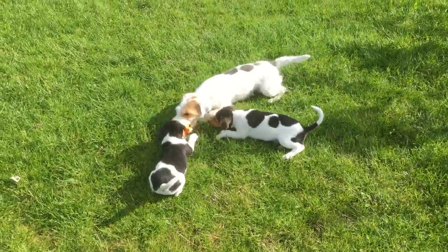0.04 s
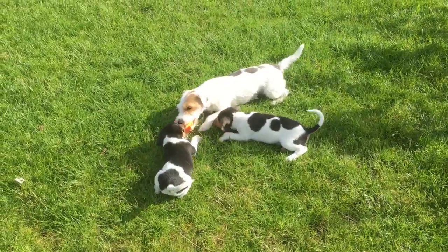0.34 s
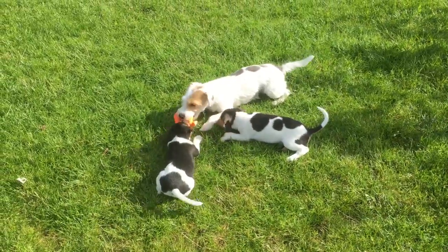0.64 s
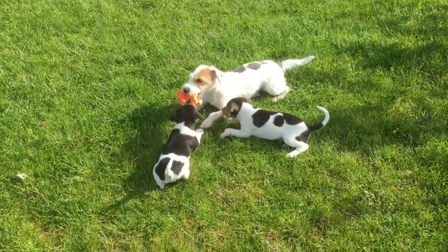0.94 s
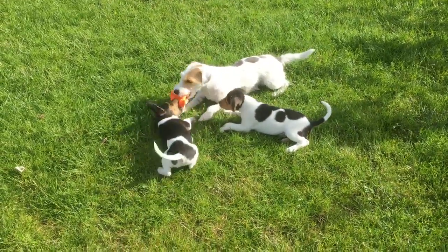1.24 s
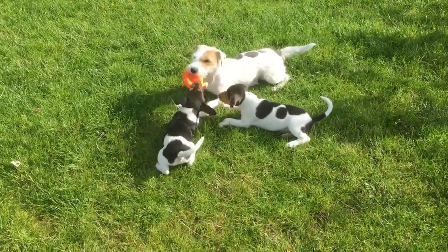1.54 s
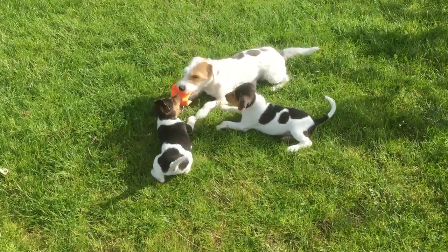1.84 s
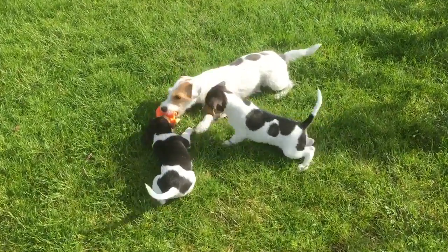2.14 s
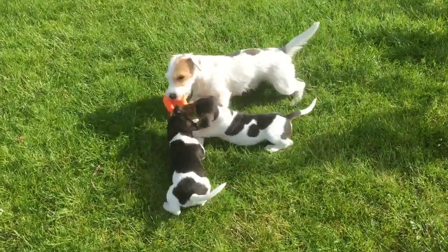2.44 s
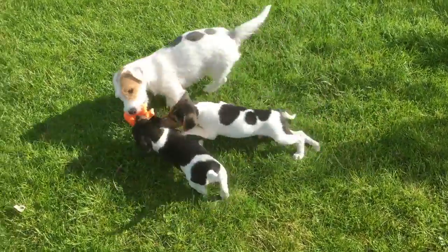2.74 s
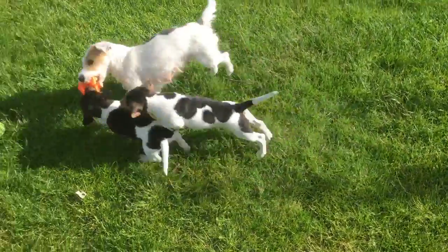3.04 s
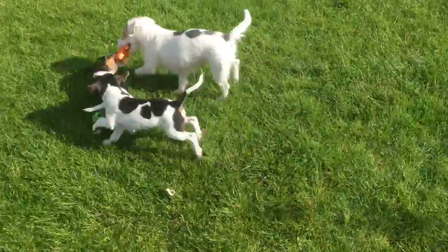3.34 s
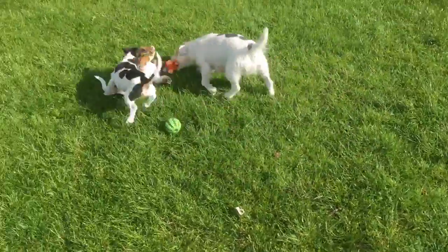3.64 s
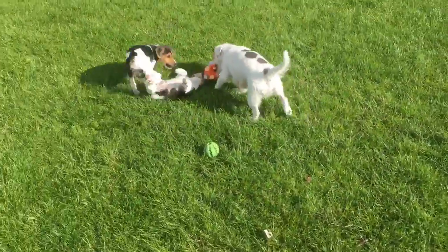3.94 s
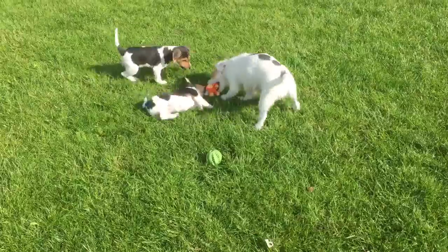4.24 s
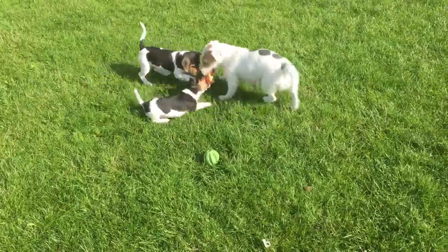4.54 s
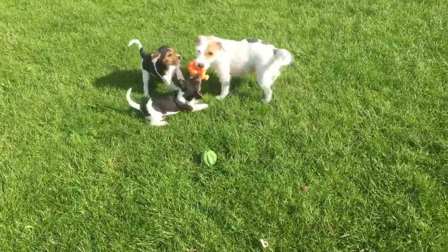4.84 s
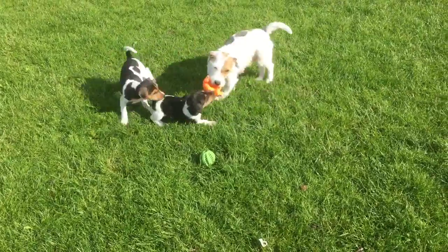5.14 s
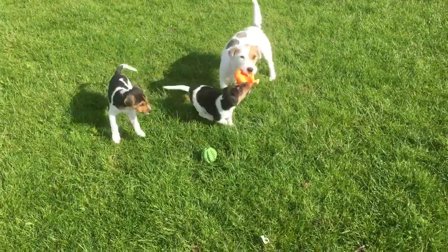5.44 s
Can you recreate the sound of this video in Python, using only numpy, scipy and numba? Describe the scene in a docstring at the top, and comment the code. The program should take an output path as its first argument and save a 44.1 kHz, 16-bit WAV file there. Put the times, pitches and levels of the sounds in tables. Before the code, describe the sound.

Rough, low play growls from small dogs tugging a squeaky rubber toy, with snorts, tooth clicks and a breeze rumbling on the microphone.

```python
"""Tug of war on the lawn

Two puppies and a grown terrier tug at a rubber toy, a few metres from a hand-held microphone.
They growl in rough bouts that open into a snarl, and snort through nose and teeth. The bitten toy
gives two pairs of yapping squeaks through its reed, air out and air in. Teeth click, a dog grunts,
the grass and the handled microphone rustle, and a breeze buffets the capsule."""
import sys
import numpy as np
from scipy import signal
from scipy.fft import rfft, irfft
from scipy.io import wavfile
from scipy.ndimage import uniform_filter1d
from numba import njit

SR = 44100
rng = np.random.default_rng(int(sys.argv[2]) if len(sys.argv) > 2 else 0)


def unload_wav(signal):
    """Save mono or channel-first audio to the path in sys.argv[1] as 16-bit WAV at rate SR, clipped to [-1, 1]."""
    wavfile.write(
        sys.argv[1],
        SR,
        np.round(np.clip(np.atleast_2d(signal).T, -1, 1) * 32767).astype(np.int16),
    )


N = 251370
T = np.arange(N) / SR
FREQ = np.maximum(np.arange(N // 2 + 1) * SR / N, 1e-3)


def undb(db):
    """Decibels to gain."""
    return 10 ** (np.asarray(db) / 20)


def unit(x):
    """Scale to rms 1."""
    return x / np.sqrt(np.mean(x ** 2))


def steady(x, span_s):
    """Hold the running rms at 1."""
    return x / np.sqrt(np.maximum(uniform_filter1d(x ** 2, int(span_s * SR)), 1e-12))


def noise():
    """White noise."""
    return rng.standard_normal(N)


def walk(rate_hz):
    """Smooth random drift of rms 1, with little motion faster than rate_hz."""
    return unit(irfft(rfft(noise()) * np.exp(-(FREQ / rate_hz) ** 2), N))


def colour(x, points):
    """Filter by a curve of (frequency [Hz], gain [dB]) and scale to rms 1."""
    hz, db = np.transpose(points)
    return unit(irfft(rfft(x) * undb(np.interp(np.log(FREQ), np.log(hz), db)), N))


def ring(x, modes):
    """Steep resonances side by side: (centre [Hz], width [Hz], gain [dB])."""
    response = sum(undb(db) / (1 + 1j * hz / width * (FREQ / hz - hz / FREQ)) ** 2
                   for hz, width, db in modes)
    return irfft(rfft(x) * response, N)


@njit
def bandpass(x, hz, width_hz):
    """State-variable band-pass with a centre for every sample."""
    y, band_state, low_state = np.empty(len(x)), 0., 0.
    for i in range(len(x)):
        g, damping = np.tan(np.pi * hz[i] / SR), width_hz / hz[i]
        band = (band_state + g * (x[i] - low_state)) / (1 + g * (g + damping))
        band_state = 2 * band - band_state
        low_state += 2 * g * band
        y[i] = damping * band
    return y


def cavity(x, hz, width_hz):
    """Two equal band-passes in a row; the centre may stand or move."""
    centre = np.full(len(x), hz, dtype=float)
    return bandpass(bandpass(x, centre, float(width_hz)), centre, float(width_hz))


def lowpass(x, hz):
    """Steep treble cut."""
    return signal.sosfilt(signal.butter(12, hz, fs=SR, output="sos"), x)


def curve(rows, column):
    """One column of a table, joined by straight lines in time."""
    rows = np.asarray(rows)
    return np.interp(T, rows[:, 0], rows[:, column])


def gate(start_s, end_s, attack_s, release_s):
    """Gain that is 1 from start to end, with a ramp before and after."""
    return np.interp(T, [start_s - attack_s, start_s, end_s, end_s + release_s], [0, 1, 1, 0])


def slack(t, start_s, length_s, crest):
    """How far an effort is from its crest: 0 there, 1 at the farther end."""
    return np.abs((t - start_s) / length_s - crest) / max(crest, 1 - crest)


def surges(rows, base):
    """Gain of surges that grow and die exponentially, added in power to a base gain."""
    power = sum((undb(db) * np.exp(-np.maximum((s - T) / rise, (T - s) / fall))) ** 2
                for s, rise, fall, db in rows)
    return np.sqrt(base ** 2 + power)


def add(track, start_s, sound, peak_db):
    """Mix in a short sound at a given peak level."""
    i = max(int(start_s * SR), 0)
    track[i:i + len(sound)] += (undb(peak_db) * sound / np.abs(sound).max())[:N - i]


def outdoor_air():
    """The quiet ambience of the garden, wavering slightly in level."""
    # spectrum of the ambience: (frequency [Hz], relative level [dB])
    spectrum = [(88, -65), (150, 8.5), (352, -8.5), (643, -7.5), (912, -11.5), (1060, -11), (1290, -10),
                (4930, -21.5), (5990, -21), (15500, -34.5)]
    return colour(noise(), spectrum) * undb(-63.5 + 0.7 * walk(6))


def wind():
    """Eddies rumble right on the microphone; the stronger ones give it a bump of a few cycles."""
    # spectrum of the rumble: (frequency [Hz], relative level [dB])
    spectrum = [(20, -42), (35, -7), (55, 3), (80, -1), (120, -6.5), (200, -15.5), (350, -28.5), (700, -44),
                (2000, -83.5)]
    # gusts: (time of peak [s], rise constant [s], fall constant [s], level [dB])
    gusts = [(.1, 0.6, 0.15, -37.5), (3.35, 0.14, 0.11, -34), (3.62, 0.031, 0.086, -30.5),
             (3.81, 0.14, 0.085, -26.5), (4.1, 0.09, 0.25, -32), (4.73, 0.018, 0.14, -33.5),
             (5.16, 0.037, 0.12, -33.5)]
    # single buffets on the capsule: (time [s], peak [dB], starting pitch [Hz])
    buffets = [(.012, -24.5, 146), (0.075, -20.5, 166.6), (0.126, -27.5, 98), (1.213, -46, 246),
               (1.852, -31, 61.3), (2.035, -30.5, 60.3), (2.269, -31.5, 74.6), (2.671, -30, 126),
               (3.597, -26.5, 78.6), (3.704, -19.5, 106.2), (3.76, -18.5, 81), (3.826, -14, 100),
               (3.921, -22.5, 100.6), (4.46, -28, 118.2), (4.566, -30, 87), (4.722, -19, 114.7),
               (5.106, -25.5, 96), (5.142, -24, 126.3), (5.307, -23.5, 110.2)]
    calm_db, breeze_db, ease_db_per_s = -68, -45, 1.56
    since = T - 1.69  # near calm until the breeze gets up
    breeze = undb(calm_db) + undb(breeze_db - ease_db_per_s * since) * np.clip(since / 0.3, 0, 1)
    rumble = steady(colour(noise(), spectrum), span_s=0.0716)
    out = rumble * surges(gusts, breeze) * undb(3.2 * walk(14.4))
    t = T[:SR // 6]
    for s, db, hz in buffets:
        cycles = hz * .09 * np.log1p(t / .09)  # the bump sags in pitch as it dies
        lopsided = np.sin(2 * np.pi * cycles) + 0.23 * np.sin(4 * np.pi * cycles)
        add(out, s, lopsided * cycles * np.exp(-cycles / 0.7), db)
    return out


def rustle():
    """Grass and the handled microphone: hiss and tiny clicks, in bands that flare up each on its own."""
    # tone of the rustle: (frequency [Hz], relative gain [dB])
    tone = [(300, 3), (1000, 4.5), (2000, -4.5), (4000, -8), (7000, -11), (11000, -9.5), (16000, -8.5)]
    # swells of rustle and hiss: (time of peak [s], rise constant [s], fall constant [s], level [dB])
    swells = [(1.03, 0.047, .1, -69.5), (1.68, 0.15, 0.096, -66.5), (2.1, 0.084, 0.15, -67.5),
              (2.37, 0.075, 0.32, -59), (2.88, 0.14, 0.25, -56), (3.1, 0.025, 0.025, -55.5),
              (3.3, 0.057, 0.36, -53.5), (3.85, 0.017, 0.082, -58.5), (4.23, 0.027, 0.21, -61),
              (4.52, 0.08, 0.074, -65.5), (5.15, 0.26, 0.24, -70)]
    bands, clicks_per_s = 0, 1500
    for hz in (1300, 3200, 6500, 12000):
        clicks = (rng.random(N) < clicks_per_s / SR) * noise()
        clicks *= undb(3.5 * np.minimum(rng.exponential(size=N), 5))  # a few stand out
        bands += ring(unit(clicks) + noise(), [(hz, hz, 0)]) * undb(2.2 * walk(22))
    texture = colour(bands, tone) * undb(1.3 * walk(25))
    light_rustle = undb(-74.5) * np.clip((T - 0.057) / 1.28, 0, 1)  # builds as the tussle starts
    return texture * surges(swells, light_rustle)


def knocks():
    """Tooth clicks and a clipped grunt: each a noise burst that rings a short knock and a dry crack."""
    # short knocks: (time [s], knock peak [dB], knock resonance [Hz], crack peak [dB])
    events = [(1.1715, -41, 1540, -54), (2.4237, -51, 1595, -43), (3.4799, -31.5, 1350, -76),
              (3.728, -49, 1013, -41.5), (4.546, -34, 1408, -43), (5.075, -34, 1700, -65),
              (5.1076, -35.5, 1480, -52), (5.1473, -31, 1600, -41), (5.2191, -25, 1620, -31)]
    out, t = np.zeros(N), T[:SR // 20]
    crack_hz = np.full(len(t), 3700.)
    for s, knock_db, knock_hz, crack_db in events:
        burst = rng.standard_normal(len(t)) * (np.exp(-t / 0.00088) + 0.18 * np.exp(-t / 0.0056))
        add(out, s, lowpass(cavity(burst, knock_hz, width_hz=750), 1714), knock_db)
        add(out, s, bandpass(burst, crack_hz, width_hz=1160.), crack_db)
    return out


def snorts():
    """Fluttering jets of air through nose and bared teeth, each whistling in two narrow passages."""
    # breaths: (time of peak [s], length [s], then per passage: centre [Hz], width [Hz], level [dB])
    breaths = [(1.73, 0.12, 3720, 1900, -60.5, 12010, 3000, -62.5),
               (2.09, 0.49, 1440, 1400, -58.5, 2820, 2530, -67.5),
               (2.478, 0.057, 2052, 499, -58.5, 3972, 1500, -71),
               (2.642, 0.25, 1774, 450, -57.5, 2934, 500, -62.5),
               (3.012, .13, 1449, 2018, -53.5, 3721, 1500, -79),
               (3.299, 0.046, 3995, 590, -42, 5490, 645, -48.5),
               (3.324, 0.28, 2093, 1494, -51, 3660, 694, -52),
               (3.438, 0.061, 1820, 598, -52, 3864, 895, -60),
               (3.588, 0.099, 1800, 1490, -52, 3870, 1520, -62.5),
               (3.83, 0.1, 2410, 1460, -43.5, 4586, 2000, -93),
               (4.061, 0.16, 1774, 893, -53.5, 3930, 1195, -65),
               (4.56, 0.28, 3096, 693.8, -62.5, 4794, 1310, -59),
               (4.88, 0.32, 9230, 1297, -67, 11950, 1506, -66.5),
               (5.107, 0.44, 3500, 1930, -61.5, 6000, 2000, -100)]
    out, jet = np.zeros(N), noise() * undb(4 * walk(130))
    for s, length, *passages in breaths:
        on = np.abs(T - s) < length / 2
        arch = np.cos(np.pi * (T[on] - s) / length) ** 1.72
        for hz, width, db in np.reshape(passages, (2, -1)):
            out[on] += unit(cavity(jet[on], hz, width)) * undb(db) * arch
    return out


def toy():
    """A reed chops the air into pulses that ring the hollow rubber; each grip colours it anew."""
    # squeezes: (start [s], length [s], crest [share of length], reed pitch [Hz], level [dB],
    #            sag by the end [Hz], fade by the end [dB], power of the decline [1 straight, 2 round])
    squeaks = [(.03, 0.069, 0.11, 458, -28.5, 16.5, 2.9, 0.87),
               (.1405, 0.055, 0.26, 463.9, -27, 18, 4.9, 2.3),
               (4.2365, 0.062, .26, 472, -24, 58, 12.9, 1.2),
               (4.3415, 0.041, 0.16, 468, -26, 31, 11.3, 2.47)]
    # resonances of the rubber: (centre [Hz], width [Hz], relative gain in each of four squeaks [dB])
    resonances = [(427, 350, 3.5, -8, -3, -2), (866, 320, 7.5, -2.5, 3.5, 6.5),
                  (1316, 170, 6, -2, 12, 10.5), (2160, 310, 2, -9.5, -38, -32), (2744, 252, 11, 3, -3, 2),
                  (4310, 370, -22, -12, -19.5, -8.5), (4970, 390, -5, -11.5, -28, -30),
                  (5620, 360, 1, -11, -11.5, -7), (6450, 410, -2, -13.5, -9, -2.5),
                  (7050, 230, -68, -16, -6, -50), (10260, 590, -13, -29, -25, -24),
                  (11400, 960, -14.5, -34, -17, -26), (15000, 1000, -26, -53, -17, -35)]
    # bands that the hollow swallows: (centre [Hz], width [Hz], gain of the subtracted band [dB])
    hollow_nulls = [(8100, 4300, 5), (13300, 940, -2)]
    # one more band pinched out by the grip: (centre [Hz]) for each squeak
    grip_null_hz = [3960, 4290, 3670, 4870]
    out, flutter, leak = 0, 1 + 0.004 * walk(250), noise()
    nip = np.exp(-((T - .097) / 0.0066) ** 4)  # the jaws clamp harder as the first squeak ends
    nip_hz, nip_db, droop_hz_per_s = 38.7, 7, 4100
    for k, (s, length, crest, hz, db, sag_hz, fade_db, power) in enumerate(squeaks):
        ease = slack(T, s, length, crest) ** power
        droop = droop_hz_per_s * np.maximum(T - s - length, 0)  # flat as the air runs out
        pitch = (hz + nip_hz * nip - sag_hz * ease - droop) * flutter
        blow = undb(db + nip_db * nip - fade_db * ease)
        blow *= gate(s, s + length, attack_s=0.0023, release_s=0.011)
        on = blow > 0
        phase = 2 * np.pi * np.cumsum(pitch[on]) / SR
        pulses = np.cos(np.outer(phase, np.arange(1, 36))).sum(axis=1)
        reed = np.zeros(N)
        reed[on] = unit(pulses) + .09 * leak[on]
        squeak = ring(reed * blow, [(centre, width, gains[k]) for centre, width, *gains in resonances])
        squeak -= ring(squeak, hollow_nulls + [(grip_null_hz[k], 1300, 0)])
        out += unit(squeak) * np.sqrt(np.mean(blow ** 2))
    return out


@njit
def vocal_folds(hz, jitter, shimmer, chance):
    """A pulse at each closure of the folds; every cycle has its own length and strength."""
    pulses, phase, turn, cycle = np.zeros(len(hz) + 1), np.empty(len(hz)), 0., 0
    for i in range(len(hz)):
        step = hz[i] * np.exp(jitter[i] * chance[cycle, 0]) / SR
        turn += step
        if turn >= 1:
            turn, cycle = turn - 1, cycle + 1
            size = np.exp(shimmer[i] * (chance[cycle, 1] + .7 * (-1) ** cycle))  # strong, weak in turn
            pulses[i] += size * turn / step
            pulses[i + 1] += size * (1 - turn / step)
        phase[i] = turn
    return pulses[:-1], phase


def bout(start_s, length_s, crest, swell_db, chest_db, throat_db, mouth_db, pitch_hz, rough, mouth_hz):
    """Start, crest and end of a growl, in the snarl's columns: effort lifts level, pitch and roughness."""
    chest_share, throat_share, throat_hz = 0.21, 0.78, 533  # shares of the mouth's swell
    crest = np.clip(crest, .02, .98)
    times = start_s + length_s * np.array([0, crest, 1])
    rows = []
    for s, ease in zip(times, slack(times, start_s, length_s, crest)):
        drop_db = swell_db * ease
        rows.append((s, chest_db - chest_share * drop_db, throat_db - throat_share * drop_db,
                     mouth_db - drop_db, pitch_hz * (1 - .02 * ease), rough * (1 - .45 * ease),
                     throat_hz, mouth_hz * (1 + 0.052 * ease)))
    return rows


def swell(bouts, column):
    """Gain from a dB column of several bouts, silent between them."""
    return sum(undb(curve(rows, column)) * gate(rows[0][0], rows[-1][0], attack_s=0.01, release_s=0.029)
               for rows in bouts)


def growls():
    """Uneven pulses and turbulent puffs ring chest, throat and mouth; more effort brings more rasp."""
    # short growls: (start [s], length [s], crest [share of length], swell [dB], then at the crest:
    #   chest [dB], throat [dB], mouth [dB], pitch [Hz], roughness [0 to about 1], mouth resonance [Hz])
    short_growls = [(0.316, 0.042, 0.43, 12.5, -57, -60, -51, 231.2, 0.96, 1550),
                    (.4, 0.59, .24, 20, -48.5, -46.5, -58, 238.2, .95, 1400),
                    (0.976, 0.11, 0.52, 14, -50, -51, -44.5, 252.8, 0.96, 1370),
                    (1.405, .355, 0.84, 19.5, -48, -52, -42, 242.4, 1.04, 1420),
                    (2.125, .17, .3, 10.5, -50.5, -56, -58, 240.8, 0.65, 1670),
                    (2.406, 0.12, .15, 17, -55.5, -54.5, -54.5, 227.2, 0.73, 1600),
                    (2.641, .1, 0.16, 15.5, -48.5, -68, -45.5, 219.1, 0.68, 1415),
                    (2.765, .175, .26, 10.5, -48, -56, -53.5, 214.8, .7, 1170),
                    (3.234, 0.16, 0.44, 5, -46, -48, -45.5, 259.7, 0.87, 1358),
                    (3.578, 0.048, .3, 14, -58, -47.5, -40, 251, 0.87, 1620),
                    (3.762, 0.059, .35, 7, -42, -46, -62, 249.3, 0.8, 1520),
                    (3.839, .11, 0.43, 15.5, -48, -50, -41.5, 242, 0.96, 1410),
                    (4.167, .062, 0.71, 2, -50, -48.5, -54.5, 232.5, 0.79, 1546),
                    (4.453, .225, .4, 12.5, -48, -55.5, -42.5, 192.6, .9, 1176),
                    (4.754, .028, 0.99, 15, -56, -66, -38.5, 207.5, 1, 1334),
                    (5.239, 0.085, .5, -0.5, -52, -86, -60, 240.9, 0.92, 1580),
                    (5.548, 0.14, 0.6, 3, -59, -63.5, -67, 268.3, 0.77, 1590)]
    # the one full snarl: (time [s], chest [dB], throat [dB], mouth [dB], pitch [Hz], roughness [0-1],
    #   throat resonance [Hz], mouth resonance [Hz])
    snarl = [(4.811, -61, -55.5, -29.5, 207.5, 0.9, 670, 1339),
             (4.886, -59, -51.5, -29, 214.1, 0.86, 704, 1440),
             (4.925, -41.5, -51, -27, 231.2, 0, 700, 1140),
             (4.952, -42, -64, -25.5, 237.7, 0.01, 717, 1190),
             (4.964, -43.5, -57, -34, 230, 0.45, 690, 1110),
             (4.985, -45.5, -48, -33.5, 221.5, 0.6, 670, 1060),
             (5.06, -45.5, -53.5, -46, 235.6, .85, 525, 1620),
             (5.12, -52, -57, -52, 241.2, 0.91, 500, 1510), (5.205, -56, -58, -55, 240.3, 1, 520, 1600)]
    # resonances that open as the lips draw back: (centre [Hz], width [Hz], relative gain [dB])
    rasp_modes = [(953, 78, 13.5), (2254, 430, 0), (2680, 240, -11.5), (3980.5, 320, -11.5)]
    bouts = [bout(*row) for row in short_growls] + [snarl]
    controls = sorted(tuple(row) for rows in bouts for row in rows)
    chest_gain, throat_gain, effort = (swell(bouts, column) for column in (1, 2, 3))
    pitch, rough, throat_hz, mouth_hz = (curve(controls, column) for column in (4, 5, 6, 7))
    rough = np.clip(rough, 0, 1)
    pitch *= np.exp((.03 + .14 * rough) * walk(38))  # slack folds wobble in pitch

    chance = rng.standard_normal((N // 50, 2))
    pulses, phase = vocal_folds(pitch, jitter=.15 * rough, shimmer=.4 * rough, chance=chance)
    pulses = steady(pulses, .02)
    puffs = unit(np.exp(-phase / .6) * noise())
    voice = pulses + .7 * rough * puffs

    chest = steady(ring(pulses + .3 * rough * puffs, [(228, 200, 0)]), .03)
    throat = steady(lowpass(cavity(voice, throat_hz, width_hz=226), 731), 0.023)
    mouth = bandpass(bandpass(voice, mouth_hz, 374.), mouth_hz, 305.)
    mouth += ring(voice, [(1033, 98, -8.5), (1470, 220, -6.0)])
    mouth = steady(lowpass(mouth, 1700), 0.026)
    rasp = steady(ring(pulses + (.5 + 2 * rough) * puffs, rasp_modes), .03)

    bared = undb(-7.0) * (effort / undb(-28.5)) ** 1.2
    flap = rough * (.7 * walk(30) + .85 * walk(80) - .35)  # loose lips and palate flutter
    low_growl = chest * chest_gain + throat * throat_gain
    open_growl = effort * (mouth + bared * rasp)
    return undb(2.2 * flap) * low_growl + undb(3.2 * flap) * open_growl


def garden(x):
    """Direct sound plus faint scattered echoes from fences and walls."""
    reverb_s, first_echo_s = 0.2, .008
    tail = noise() * np.exp(-T * np.log(1000) / reverb_s) * (T > first_echo_s)
    return x + undb(-21.5) * signal.fftconvolve(x, tail / np.linalg.norm(tail))[:N]


def scene():
    """Dogs and toy a few metres off on the lawn, over breeze and quiet outdoor air, in mono."""
    air = outdoor_air()
    dogs_and_toy = garden(growls() + snorts() + toy() + knocks())
    return (dogs_and_toy + rustle() + wind() + air)[None]


def record(dry):
    """The microphone sheds the deepest rumble; the recorder cuts the top steeply."""
    low_cut_hz, top_hz = 36, 15900
    thin = signal.sosfilt(signal.butter(4, low_cut_hz, "highpass", fs=SR, output="sos"), dry)
    return signal.sosfilt(signal.ellip(10, .2, 80, top_hz, fs=SR, output="sos"), thin)


dry = scene()
out = record(dry)
unload_wav(out)
```